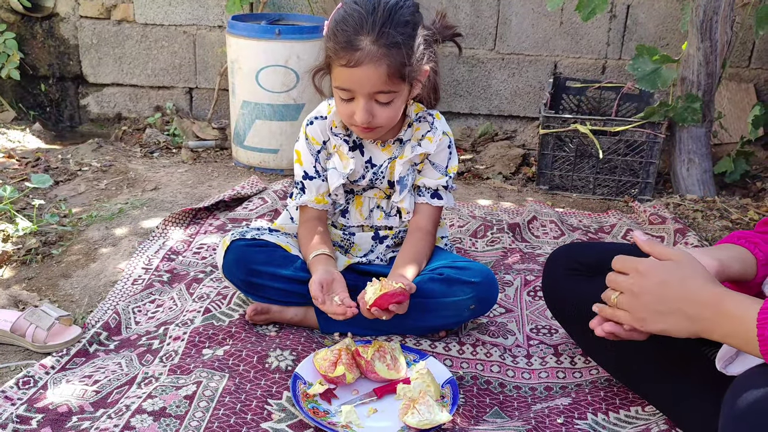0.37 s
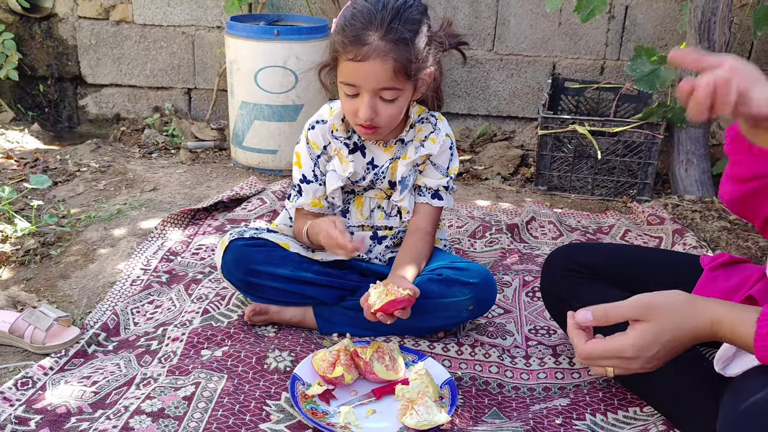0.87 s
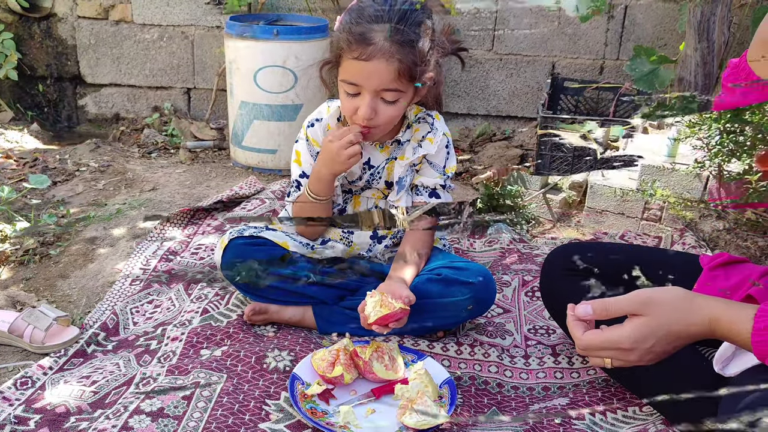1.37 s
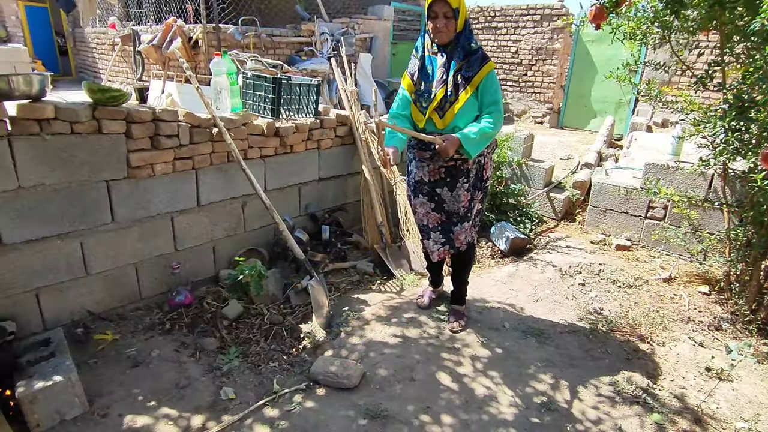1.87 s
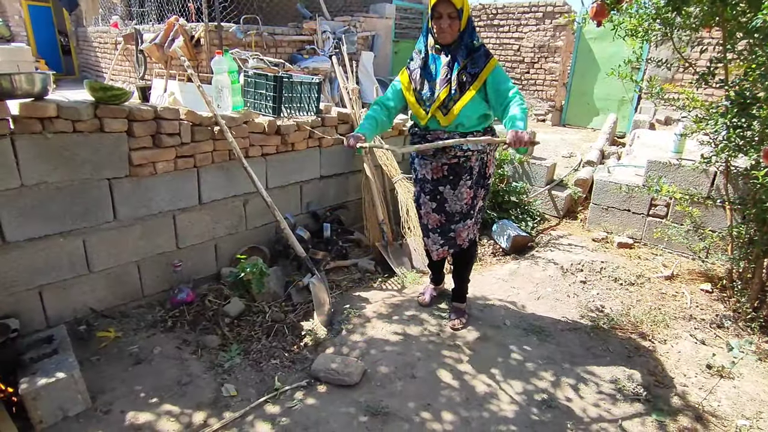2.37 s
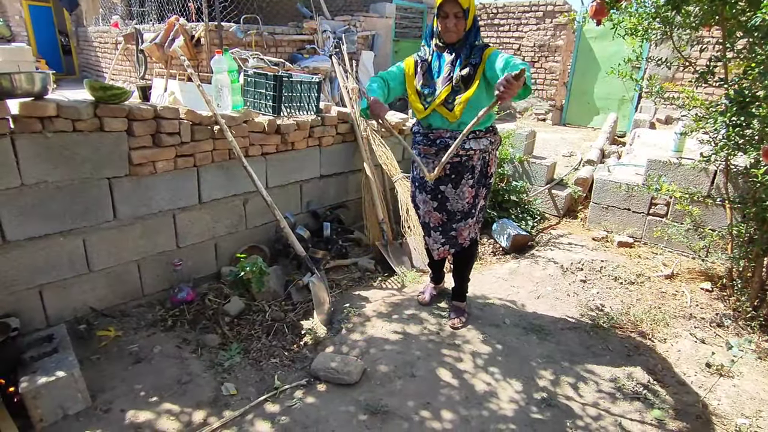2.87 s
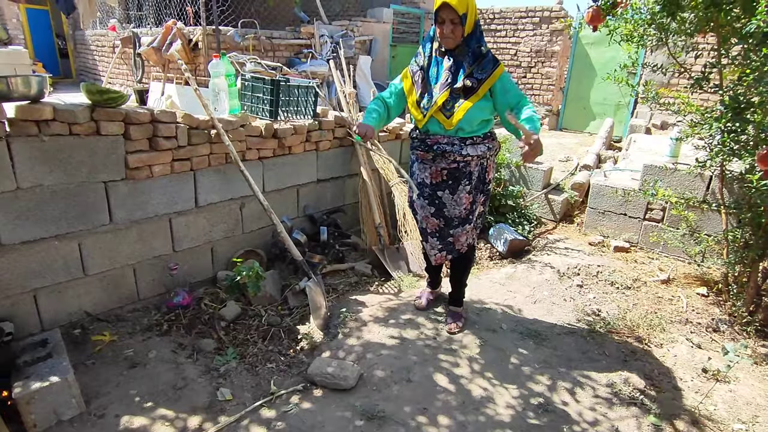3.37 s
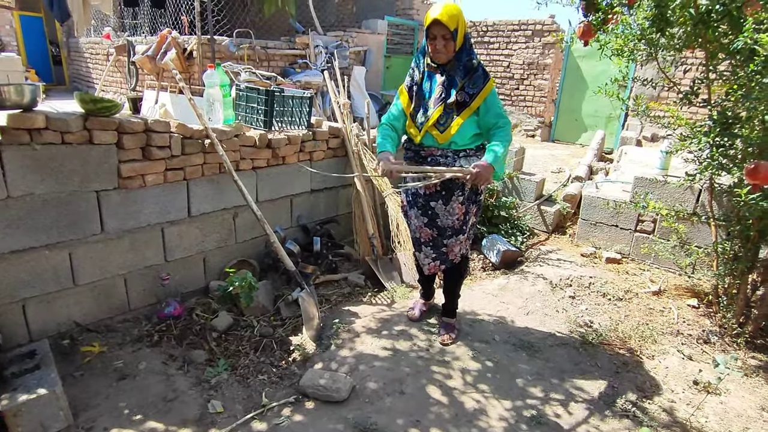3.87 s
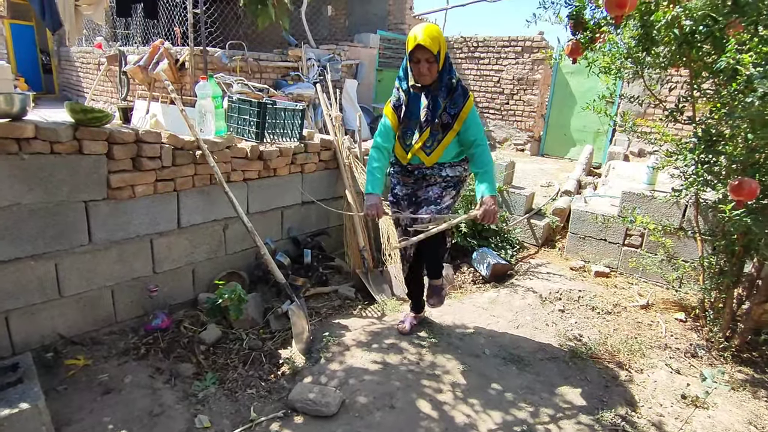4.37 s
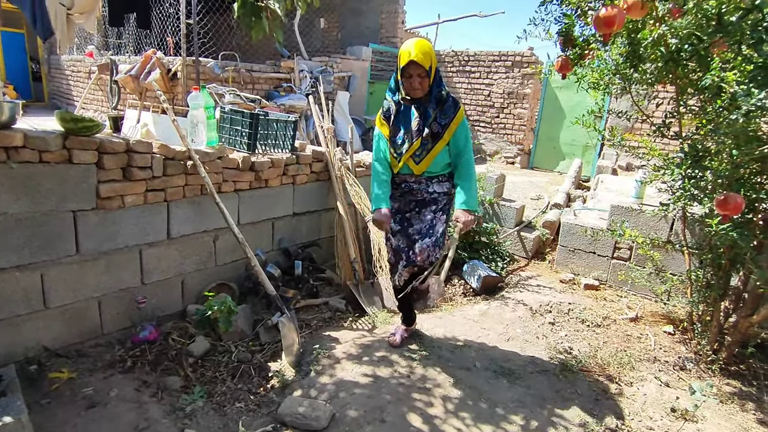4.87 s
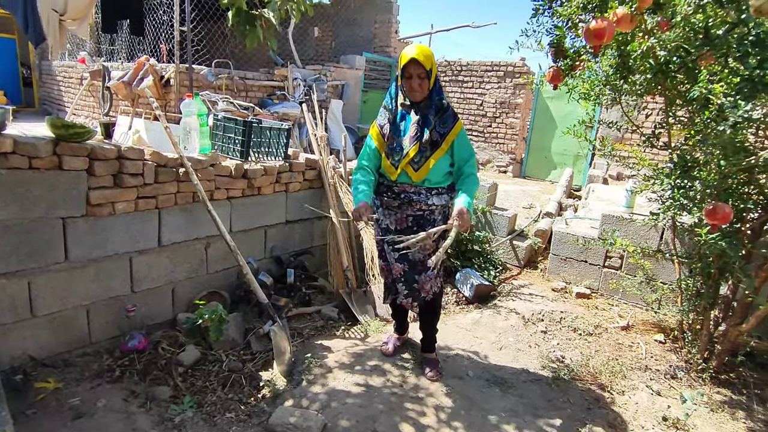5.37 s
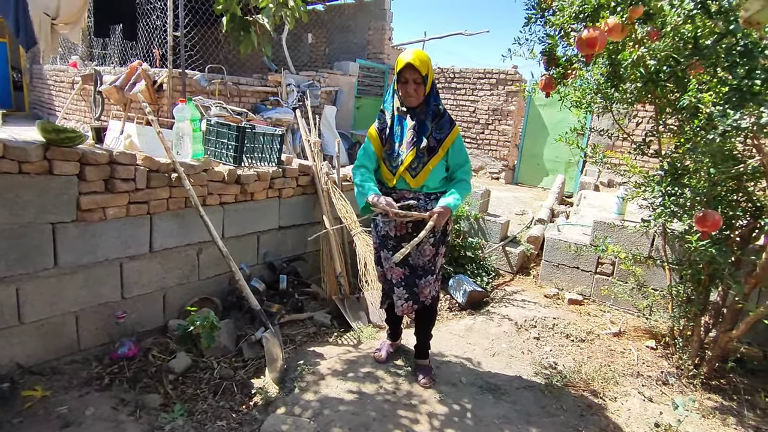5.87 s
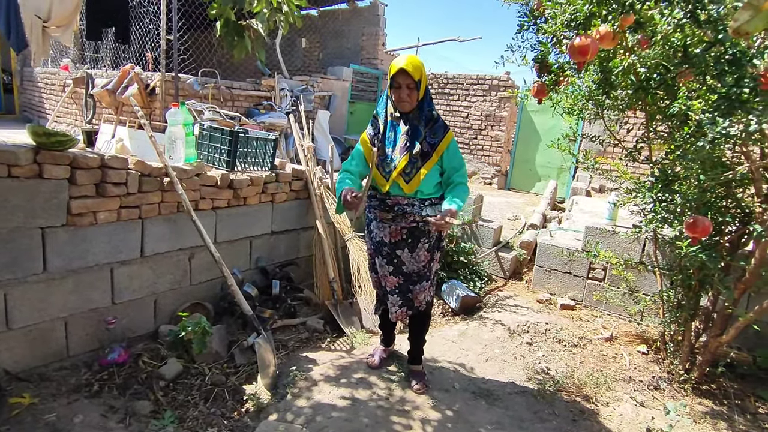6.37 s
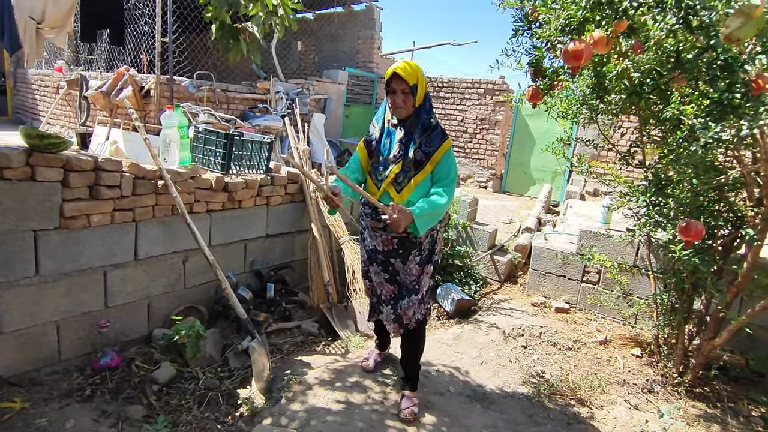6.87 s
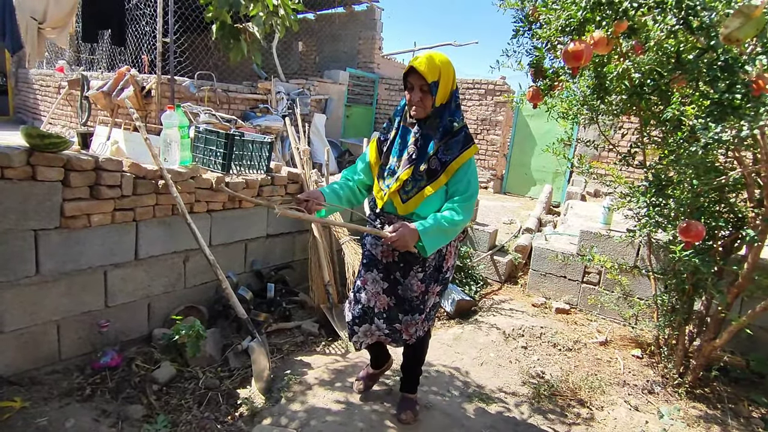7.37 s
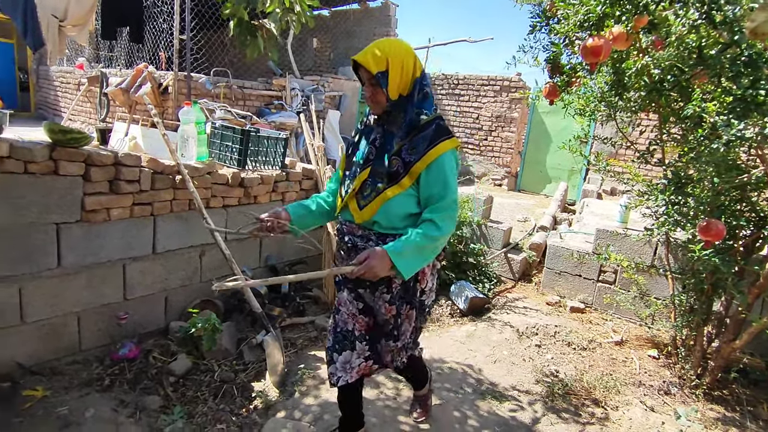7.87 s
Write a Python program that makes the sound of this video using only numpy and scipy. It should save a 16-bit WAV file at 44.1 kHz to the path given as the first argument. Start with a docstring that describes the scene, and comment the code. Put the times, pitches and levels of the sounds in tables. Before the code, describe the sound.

From 0 to 1.4 s, low village air rumble with scattered hollow knocks and a few small, faint wood clicks. Around 1.5 s the air colour shifts and a distant small engine fades in, slowly speeding up until about 7 s. A short high bird peep sounds at 1.6 s. From 1.7 s dry sticks crack and rustle, thickening into bright, brittle tearing at 2.4-3.1 s, then thinning to a few isolated ticks. At 4.9 s a thick stick breaks with a very loud, sharp, dry snap and brief yard echo; a piece lands at 5.37 s with a small thud. A far rooster crows hoarsely, 5.4-6.4 s, over a faint wavering low tone. Until 8 s come hollow knocks, light wood clicks, a brief gritty shoe scuff at 6.9 s, soft wind bumps around 6.6-7.4 s and another foot scuff at 7.7 s.

```python
"""Low village rumble and hollow knocks come first; soon dry sticks are bent, torn and snapped in a walled
yard, a few steps from a hand-held pair of microphones. Far off a small engine speeds up, a cock crows, a
bird peeps and a low tone wavers. Wood is shaped noise with brief rings, struck things are dying sines,
engine, cock and bird are sines that follow pitch curves, and air and wind are coloured noise."""
import sys
import numpy as np
from scipy import signal
from scipy.fft import rfft, irfft, next_fast_len
from scipy.io import wavfile
from scipy.ndimage import uniform_filter1d

SR = 44100
rng = np.random.default_rng(int(sys.argv[2]) if len(sys.argv) > 2 else 0)


def generate_wav(sig):
    """Save sig (samples, or channels by samples) to the path in sys.argv[1] as 16-bit PCM at SR."""
    pcm = np.round(np.clip(np.atleast_2d(sig).T, -1, 1) * 32767).astype(np.int16)
    wavfile.write(sys.argv[1], SR, pcm)


def amplitude_ratio(level_db):
    """Convert a level in decibels to the matching linear amplitude (field) ratio."""
    exponent = np.asarray(level_db, float) / 20
    return 10 ** exponent


N = 352932  # samples, about 8 s


def evened(x):
    """Scales to rms 1."""
    return x / np.sqrt(np.mean(x ** 2) + 1e-20)


def read(points, hz):
    """Columns of a spectrum at hz, straight on a log axis."""
    f, *columns = np.transpose(points)
    return np.array([np.interp(np.log(hz + 1), np.log(f + 1), c) for c in columns])


def follow(rows, t):
    """Columns of a curve at times t."""
    s, *columns = np.transpose(rows)
    return np.array([np.interp(t, s, c) for c in columns])


def band(x, low_hz, high_hz):
    """Keeps one band of a sound."""
    return signal.sosfilt(signal.butter(2, [low_hz, high_hz], "bandpass", fs=SR, output="sos"), x)


def add(mix, s, sound, pan_db=0, lag_s=0):
    """Lays a sound into both channels: pan_db louder on the left, where it arrives lag_s later."""
    for side, (at, db) in enumerate([(s + lag_s / 2, pan_db / 2), (s - lag_s / 2, -pan_db / 2)]):
        part = mix[side, max(round(at * SR), 0):][:len(sound)]
        part += amplitude_ratio(db) * sound[:len(part)]


def swell(t, peak_s, rise_s, fall_s, db):
    """Gain that climbs to a peak and dies away, straight in dB; rise and fall times each span 20 dB."""
    times = np.where(t < peak_s, (peak_s - t) / rise_s, (t - peak_s) / fall_s)
    return amplitude_ratio(db - 20 * times)


def wander(rate, count):
    """Slow drift of rms 1, one row each: sines up to rate Hz with random phases."""
    t = np.arange(0, N + 256, 256) / SR
    hz = np.geomspace(.6, rate, num=16)
    phase = hz[:, None] * t + rng.random((count, 16, 1))
    rows = np.sin(2 * np.pi * phase) / np.sqrt(hz)[:, None]
    return [np.interp(np.arange(N) / SR, t, evened(row)) for row in rows.sum(axis=1)]


def tone(rows, waver_db):
    """A slightly unsteady sine that follows a curve of pitch and level."""
    hz, db = follow(rows, np.arange(rows[0][0], rows[-1][0], 1 / SR))
    waver = evened(uniform_filter1d(rng.standard_normal(len(hz)), size=len(hz) // 10))
    return np.sqrt(2) * amplitude_ratio(db + waver_db * waver) * np.sin(2 * np.pi * np.cumsum(hz) / SR)


def ring(modes, contact_s):
    """Dying sines of a struck thing, set off by a burst of noise that fades over contact_s; peak 1."""
    t = np.arange(SR // 8) / SR
    x = sum(amplitude_ratio(db - 60 * t / t60) * np.sin(2 * np.pi * hz * t) for hz, db, t60 in modes)
    contact = rng.standard_normal(1000) * np.exp(-t[:1000] / contact_s)
    x = signal.fftconvolve(x, contact)[:len(t)]
    return x / abs(x).max()


# echo decay of the yard: f/Hz, t60/s
YARD_DECAY = [(300, 0.12), (1500, 0.26), (4000, 0.26), (9000, 0.15), (14000, 0.048)]


def yard(x):
    """Sparse echoes from ground and walls, each band dying at its own speed."""
    taps = np.zeros((2, SR // 2))
    at = np.arange(80, SR // 2 - 20, 20) + rng.integers(0, 20, (2, (SR // 2 - 81) // 20))
    np.put_along_axis(taps, at, rng.choice([-1., 1.], at.shape), 1)
    hz, t, z = signal.stft(taps, SR, nperseg=128)
    decay = amplitude_ratio(-60 * t / read(YARD_DECAY, hz)[0][:, None])
    tail = signal.istft(z * decay, SR, nperseg=128)[1]
    return signal.fftconvolve(x, tail / np.linalg.norm(tail[0]), axes=1)[:, :N]


def ground_bounce(near):
    """The bounce off hard earth: one softer copy, a little later on the right than on the left."""
    return amplitude_ratio(-8.0) * np.array([np.roll(x, round(s * SR)) for x, s in zip(near, (.0026, .0031))])


# colour of the air before and after the move to the open ground: f/Hz, relative level/dB, relative level/dB
AIR_COLOUR = [(35.3, -10, -11.5), (97.6, 5, 1.5), (175.3, -2.5, -5), (253.9, -7, -4.5), (416, -12, -11),
              (576, -4, -9), (1040, -10.5, -12), (1244, -9, -14), (2460, -21, -20.5), (9840, -41.5, -38),
              (16000, -33, -35)]
# shared part of left and right: f/Hz, likeness (0 to 1)
AIR_LIKENESS = [(60, 0.33), (200, 0.89), (600, 0.59), (1400, 0.64), (3000, 0.099), (7000, 0.091)]


def air():
    """Random short-time spectra; the yard's colour blends into the open ground's, its direction flips."""
    level_db, patch_db = -60, 2.66
    frames, hz = N // 256 + 5, np.fft.rfftfreq(1024, 1 / SR)[:, None]
    a, b, c, d, patches = rng.standard_normal((frames, 513, 5)).T
    patches = evened(uniform_filter1d(uniform_filter1d(patches, size=8, axis=0), size=10, axis=1))
    moved = np.interp(np.arange(frames) * 256 / SR, (1.1, 1.5), [0, 1])
    first_db, second_db = read(AIR_COLOUR, hz)
    # the rumble reaches the right first, then the left
    left_lag_s = np.where(moved < .5, 0.00047, -0.00033)
    same = read(AIR_LIKENESS, hz)[0]
    right = a + 1j * b
    shared = same * right * np.exp(-2j * np.pi * hz * left_lag_s)
    left = shared + np.sqrt(1 - same ** 2) * (c + 1j * d)
    colour_db = first_db + moved * (second_db - first_db) + patch_db * patches
    z = np.array([left, right]) * amplitude_ratio(colour_db)
    return amplitude_ratio(level_db) * evened(signal.istft(z, nperseg=1024, noverlap=768)[1][:, :N])


# gusts on the microphone ports: t/s, level/dB
WIND_GUSTS = [(6.65, -56), (7.06, -52.5), (7.381, -57.5)]


def wind():
    """Lumpy low noise in short gusts, unrelated at the two ports."""
    rise_s, fall_s, breeze_db = 0.054, 0.11, -95
    t = np.arange(0, N + 64, 64) / SR
    gain = amplitude_ratio(breeze_db) + sum(swell(t, s, rise_s, fall_s, db) for s, db in WIND_GUSTS)
    low = band(rng.standard_normal((2, N)), 18, 55)
    side_gain = amplitude_ratio([[1.5], [-1.5]])  # left, right
    return evened(low) * np.interp(np.arange(N) / SR, t, gain) * side_gain


# engine speed and loudness: t/s, firings per second, level/dB
ENGINE_RUN = [(1.3, 28.4, -63.5), (1.85, 28.9, -58), (2.7, 30.5, -56), (3.6, 32, -57.5), (4.4, 33, -62.5),
              (5.3, 34.1, -60), (6.1, 35.7, -62), (7.2, 36, -62)]
# colour of the exhaust: f/Hz, relative level/dB
EXHAUST_COLOUR = [(70, -29), (105, -1), (150, 2.5), (250, -4.5), (330, -4.5), (400, -20), (500, -40.5)]


def engine():
    """Multiples of the firing rate, each fading on its own over the long way, above a roar."""
    flat_rate, tilt_per_firing = 31.1, 1.6  # firings per second; dB per octave for each one above that
    t = np.arange(N) / SR
    rate, db = follow(ENGINE_RUN, t)
    tilt_db = tilt_per_firing * (rate - flat_rate)
    turns, fades = np.cumsum(rate) / SR, wander(rate=5.0, count=12)
    lines = 0
    for k, fade in zip(range(3, 15), fades):
        line_db = read(EXHAUST_COLOUR, k * rate)[0] + tilt_db * np.log2(k / 6) + 2.6 * fade
        lines = lines + amplitude_ratio(line_db) * np.cos(2 * np.pi * (k * turns + rng.random()))
    roar_colour = amplitude_ratio(read(EXHAUST_COLOUR, np.fft.rfftfreq(N, 1 / SR))[0])
    roar = irfft(rfft(rng.standard_normal(N)) * roar_colour, N)
    heard = np.interp(t, [1.2, 1.8, 6.9, 7.15], [0, 1, 1, 0])
    return heard * amplitude_ratio(db) * (amplitude_ratio(-7.5) * lines + amplitude_ratio(-12.5) * evened(roar))


# a low tone far off: t/s, f/Hz, level/dB
HUM_CURVE = [(5.2, 150, -73), (6, 137, -66.5), (6.8, 136, -69), (7.5, 138, -76)]


def hum(far):
    """A low sine gliding in pitch, its level wavering."""
    add(far, HUM_CURVE[0][0], tone(HUM_CURVE, waver_db=3.5))


# one short bird call: t/s, f/Hz, level/dB
PEEP_CURVE = [(1.594, 3680, -83), (1.6, 3720, -59), (1.63, 3670, -62), (1.638, 3670, -70),
              (1.68, 3670, -79)]


def peep(far):
    """A bird's whistle: a brief, nearly steady sine."""
    add(far, PEEP_CURVE[0][0], tone(PEEP_CURVE, waver_db=1.0))


# pitch of the cock: t/s, f/Hz
CROW_MELODY = [(5.42, 812.7), (5.56, 878), (5.7, 816), (6.43, 778)]
# syllables of the cock: peak t/s, rise/s, fall/s, level/dB
CROW_SWELLS = [(5.52, 0.072, 0.25, -65), (5.635, 0.051, 0.16, -70), (6.12, 0.82, 3, -77.5)]


def crow():
    """A wavering tone whose octave grows; its hoarse start has lines a sixth of the pitch apart."""
    t = np.arange(CROW_MELODY[0][0], CROW_MELODY[-1][0], 1 / SR)
    hz, age = follow(CROW_MELODY, t)[0], t - t[0]
    gain = sum(swell(t, *row) for row in CROW_SWELLS)
    hoarse_db = 11 - 103 * age  # fades by 103 dB a second
    octave_db = np.minimum(-13 + 32 * age, 6.5)
    shake = evened(uniform_filter1d(rng.standard_normal((6, len(t))), size=700))
    pitch_shake = (0.0031 + 0.023 * np.exp(-age / 0.29)) * shake[0]
    phase = 2 * np.pi * np.cumsum(hz * (1 + pitch_shake)) / SR
    hoarse = sum(shake[k] * np.sin(k * phase / 6) for k in (3, 4, 5))
    voice = np.sin(phase) + amplitude_ratio(hoarse_db) * hoarse + amplitude_ratio(octave_db) * np.sin(2 * phase)
    return np.sqrt(2) * gain * amplitude_ratio(2.5 * shake[1]) * voice


# clear hollow knocks: t/s, peak level/dB
CLEAR_KNOCKS = [(0.152, -50), (0.369, -49.5), (0.951, -53.5), (1.03, -50), (1.155, -45.5), (4.386, -50.5),
                (5.146, -49), (6.102, -52), (6.235, -55), (6.468, -46), (6.719, -52), (6.872, -50),
                (6.972, -49.5), (7.283, -48.5), (7.374, -49), (7.543, -46.5)]
# typical knock, scattered from hit to hit: f/Hz, relative level/dB, t60/s
HOLLOW_MODES = [(630, -11, 0.016), (760, -8, 0.013), (972, 4, 0.036), (1204, -17.5, 0.037)]


def knocks():
    """Clear knocks and a scatter of faint ones: dying sines, detuned and rebalanced at every hit."""
    faint_per_s, faintest_db = 11, -63.5
    out, count = np.zeros((2, N)), round(faint_per_s * N / SR)
    faint = [(place * N / SR, faintest_db + 8.6 * size) for place, size in rng.random((count, 2))]
    for s, db in list(CLEAR_KNOCKS) + faint:
        modes = [(hz * rng.uniform(0.918, 1.1), mode_db + rng.normal(0, 2.7), t60)
                 for hz, mode_db, t60 in HOLLOW_MODES]
        add(out, s, amplitude_ratio(db) * ring(modes, contact_s=0.0044), pan_db=-2.5, lag_s=.0002)
    return out


def scuff(near):
    """A shoe drags on grit: noise of uneven level that starts and stops with the shoe."""
    hold_s, edge_s, level_db = 0.054, 0.0042, -62.5
    t = np.arange(0, hold_s + edge_s, 1 / SR)
    noise, grit = rng.standard_normal((2, len(t)))
    x = noise * amplitude_ratio(3.3 * evened(uniform_filter1d(grit, size=90)))
    edges = np.clip(np.minimum(t, t[-1] - t) / edge_s, 0, 1)
    add(near, 6.918, amplitude_ratio(level_db) * evened(band(x, 900, 4400)) * edges)


# sticks, leaves and feet rubbing: peak t/s, rise/s, fall/s, level/dB, tilt (dull to bright)
RUB_STROKES = [(.95, 5.2, 0.33, -80, -3), (1.65, 0.2, 0.46, -64, -0.5), (2.06, 0.24, 0.14, -64, -1),
               (2.49, 0.043, 0.12, -50.5, 0), (2.71, 0.28, 0.15, -53.5, 3), (2.775, 0.19, 0.017, -61, 5),
               (3.08, 0.14, 0.21, -61, -0.1), (3.9, 0.3, 0.38, -77, 1.5), (4.601, 1.2, 2.3, -75, -1.5),
               (5.91, 0.075, 0.56, -70.5, -1.5), (7.3, 2.8, 4, -79, -1), (7.722, 0.0065, 0.11, -64.5, -3)]


def strokes():
    """Gain and tilt of the rubbing: the strokes add up in power, and the loudest sets the colour."""
    still_db, still_tilt = -92, -2  # between strokes
    t = np.arange(0, N + 32, 32) / SR
    gains = np.array([swell(t, *row[:4]) for row in RUB_STROKES] + [amplitude_ratio(still_db) + 0 * t])
    gain = np.sqrt((gains ** 2).sum(axis=0))
    tilt = np.array([row[4] for row in RUB_STROKES] + [still_tilt]) @ gains ** 2 / gain ** 2
    return [np.interp(np.arange(N) / SR, t, x) for x in (gain, tilt)]


def rustle():
    """Hiss and many tiny snaps, each ringing briefly at one of 12 pitches; tilt mixes dull and bright."""
    gain, tilt = strokes()
    ticks = (rng.random(N) < 1300 / SR) * amplitude_ratio(6.8 * np.minimum(rng.exponential(1, N), 2.6))
    twig, t = rng.integers(0, 12, N), np.arange(256) / SR
    rings = 0
    for k, hz in enumerate(np.geomspace(1800, 6500, num=12)):
        twig_ring = amplitude_ratio(-60 * t / 0.019) * np.sin(2 * np.pi * hz * t)
        rings = rings + signal.oaconvolve(ticks * (twig == k), twig_ring)[:N]
    grains = signal.lfilter([1], [1, -.95], ticks) * rng.standard_normal(N)
    hiss = rng.standard_normal((2, N))
    x = 1.5 * evened(grains) + 1.6 * evened(rings) + 0.7 * hiss
    dull, middle, bright = band(x, 900, 2500), band(x, 2500, 7000), band(x, 7000, 17000)
    mixed = amplitude_ratio(-5 - 1.8 * tilt) * dull + middle + amplitude_ratio(3.0 + 1.8 * tilt) * bright
    return gain * mixed / np.sqrt(np.mean(middle ** 2))


# a broken piece on the ground: f/Hz, relative level/dB, t60/s
LANDING_MODES = [(170, 2, .07), (240, -1, .05), (320, -2, .05), (960, 1, .03), (1380, 7, .025)]


def landing(near):
    """The body of a broken piece landing: one sharp contact sets off short dying sines."""
    add(near, 5.3632, amplitude_ratio(-32.5) * ring(LANDING_MODES, contact_s=1 / SR), pan_db=1.5)


def crack(db, ring_hz, tilt_db, splinter_t60):
    """A first burst, then ever weaker fibres; the sound favours one short ring and a few thin notes."""
    noise, chance, size = rng.uniform(-1, 1, 8192), rng.random(8192), rng.random(8192)
    t, hz = np.arange(8192) / SR, np.fft.rfftfreq(8192, 1 / SR)
    fibres = uniform_filter1d((chance < 900 / SR) * size ** 3, size=16) * 16
    first_burst = amplitude_ratio(-60 * t / 0.0053)
    splinters = amplitude_ratio(-11.0 - 60 * t / splinter_t60) * (0.33 + 1.55 * fibres)
    x = noise * (first_burst + splinters) * np.minimum(t / 0.0011, 1)
    x = np.roll(x, 64)  # room ahead of the burst for the filters
    thin = hz ** 4 / (hz ** 4 + 1500 ** 4)  # a thin stick radiates little bass
    tilt = amplitude_ratio(tilt_db * np.log2(np.maximum(hz, 1800) / 4000))
    notes_hz = 2050 * (7300 / 2050) ** rng.random((6, 1))
    notes = 1.1 * (1 / (1 + 1j * (hz - notes_hz) / 43)).sum(axis=0)  # each falls 3 dB at 43 Hz off
    dull_db = 0.4 * max(-tilt_db, 0)  # dull cracks ring more
    body = 2.6 * amplitude_ratio(dull_db) / (1 + 1j * 12 * (hz / ring_hz - 1))
    x = irfft(rfft(x) * thin * tilt * (1 + notes + body), len(x))
    middle = irfft(rfft(x) * ((hz > 2000) & (hz < 7000)), len(x))
    return amplitude_ratio(db) * x / abs(middle).max()


# a stick's own body: f/Hz, relative level/dB, t60/s
BODY_MODES = [(258, -10, 0.05), (490, -10, 0.034), (900, 2.5, 0.025), (1068, -7.5, 0.042), (1298, 1, 0.025),
              (2136, 0, 0.026)]


def thump(burst_db):
    """A stick's body under each burst: short dying sines, 12.5 dB below the burst's setting."""
    return amplitude_ratio(burst_db - 12.5) * ring(BODY_MODES, contact_s=0.0002)


# wood cracks, with the click of a landing piece (5.365 s) and a foot scuff (7.72 s):
# t/s, peak level of the 2-7 kHz band/dB, ring f/Hz, tilt/(dB per octave)
CRACKS_AND_CLICKS = [(0.2366, -56, 2300, -1), (0.9324, -49, 2940, -5.5), (0.972, -50, 4000, 2),
                     (1.4043, -55, 2150, -4), (1.7005, -44, 3970, 5), (1.7064, -45.5, 3600, -5),
                     (1.7122, -50, 3540, 3), (1.7494, -54, 3270, 1), (1.804, -42, 3960, 0.5),
                     (1.849, -49, 3060, 2), (1.8621, -41.5, 4160, 7), (1.87, -57, 4890, -4),
                     (1.8844, -58, 3350, -10), (2.0206, -53, 3550, 8.5), (2.052, -54, 2450, -11),
                     (2.1547, -48, 2250, -2.5), (2.385, -43, 3600, 9.5), (2.3898, -41.5, 3800, -3.5),
                     (2.4647, -53, 4000, -1), (2.47, -31.5, 3980, 5), (2.4966, -45, 4840, 14),
                     (2.507, -33, 5900, -3), (2.551, -49, 5000, 1), (2.5602, -39.5, 3900, 5),
                     (2.5787, -41.5, 4770, 6), (2.5845, -29, 3220, 2), (2.642, -45.5, 4160, 9),
                     (2.655, -44, 4100, -1.1), (2.674, -37, 4450, 8.5), (2.682, -42, 4000, 2),
                     (2.6954, -28.5, 5070, 0), (2.7264, -46, 5840, -2), (2.8127, -37, 4100, 6.5),
                     (2.992, -51.5, 4460, 8.5), (3.044, -41.5, 4170, 0.5), (3.0943, -31, 7300, 3.5),
                     (3.0968, -29.5, 4930, 0.5), (3.3465, -51.5, 2380, -0.5), (3.5561, -45, 2430, -2),
                     (4.258, -54, 2380, -2), (4.808, -50, 3400, 6), (5.365, -43, 2093, -8.5),
                     (6.062, -54, 4040, 0.5), (6.1697, -51, 4050, 2.5), (7.2134, -72, 5500, 7),
                     (7.3695, -47.5, 2430, -4), (7.3725, -50.5, 4250, -1.5), (7.541, -53.5, 2450, -15.5),
                     (7.648, -53.5, 4270, -4.5), (7.721, -50.5, 2400, -9.5), (7.741, -51, 2380, -3)]
# the thick stick gives, breaks, and breaks through: the same four columns, then splinter t60/s
THICK_SNAP = [(4.8827, -30.5, 3500, 6.5, 0.3), (4.8975, -13, 4400, -1, 0.037), (4.8996, -16, 5950, 4, 0.05),
              (4.9044, -24.5, 2260, -3, 0.09)]


def cracks_and_clicks(near):
    """Wood cracks, a landing click and a foot scuff, all one kind of burst over a thump; then the snap's top."""
    splinter_t60 = 0.068  # s
    for s, db, *colour in THICK_SNAP + [(*row, splinter_t60) for row in CRACKS_AND_CLICKS]:
        pan_db, lag_s = rng.uniform(-2, 2), rng.uniform(-.000025, .000025)
        add(near, s - 64 / SR, crack(db, *colour), pan_db, lag_s)
        add(near, s, thump(db), pan_db=3.5)
    # the snap faces the left port: lift the top treble there by adding a filtered copy
    snap = slice(round(THICK_SNAP[0][0] * SR) - 64, round(THICK_SNAP[-1][0] * SR) + 8192)
    top = signal.butter(4, 9800, "highpass", fs=SR, output="sos")
    near[0, snap] += amplitude_ratio(1.5) * signal.sosfiltfilt(top, near[0, snap])


def scene():
    """Near wood and far sounds share the echo of the yard; engine, air and wind come without it."""
    near, far = np.zeros((2, N)), knocks()
    cracks_and_clicks(near)
    scuff(near)
    near += rustle()
    bounce = ground_bounce(near)
    landing(near)  # on the earth itself: no bounce
    add(far, CROW_MELODY[0][0], crow(), pan_db=1.5, lag_s=-.0003)
    peep(far)
    hum(far)
    wood = near + bounce + amplitude_ratio(-9.0) * yard(near)
    return wood + far + amplitude_ratio(-7.5) * yard(far) + engine() + air() + wind()


def top_cut(x):
    """Nothing passes above the cut-off."""
    return signal.sosfilt(signal.butter(12, 17010, fs=SR, output="sos"), x)


# colour of the two microphone ports, together with a steep cut above 14 kHz that is not theirs:
# f/Hz, left level/dB, right level/dB, phase by which left leads/rad
COLOUR_AND_CUT = [(1020, 1.5, 2, 0), (1780, 1, 3.5, 0.87), (5500, 4, 3.5, 0.6), (7010, 3.5, 5.5, 3),
                  (8040, -13, -2, 1), (8650, -2, 12, 3), (9400, 1, 20, 5.5), (10700, 7.5, 12.5, 4),
                  (11920, 4, 14.5, 5), (14140, 1.5, 4.5, 5.5), (14620, -18, -22, 6.5),
                  (16120, -46, -43.5, 8), (17000, -52, -66, 2)]


def record(dry):
    """Colours left and right as the two ports do, cuts steeply above 14 kHz, rounds off the loudest peaks."""
    overload = .66  # of the input stage; full scale is 1
    size = next_fast_len(N)
    left_db, right_db, lead = read(COLOUR_AND_CUT, np.fft.rfftfreq(size, 1 / SR))
    colour = np.array([amplitude_ratio(left_db) * np.exp(1j * lead), amplitude_ratio(right_db)])
    heard = irfft(rfft(dry, size) * colour, size)[:, :N]
    mix = overload * np.tanh(heard / overload)
    return top_cut(mix)


dry = scene()
out = record(dry)
generate_wav(out)
```